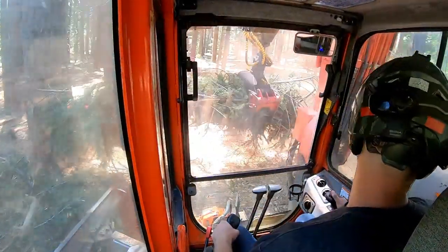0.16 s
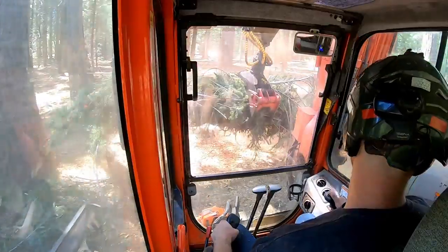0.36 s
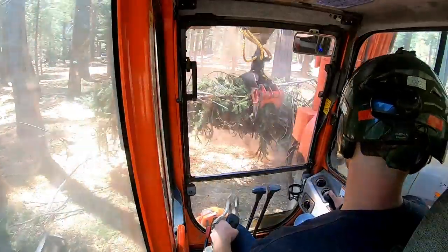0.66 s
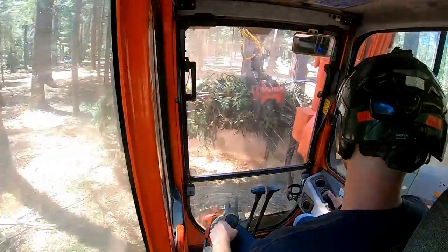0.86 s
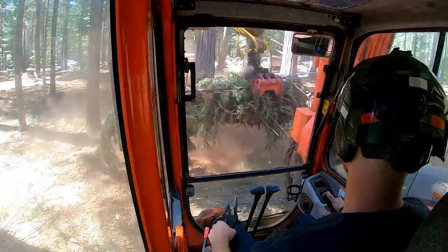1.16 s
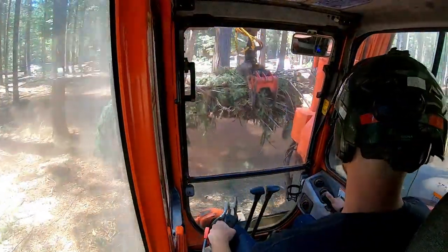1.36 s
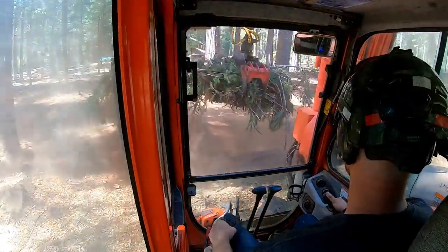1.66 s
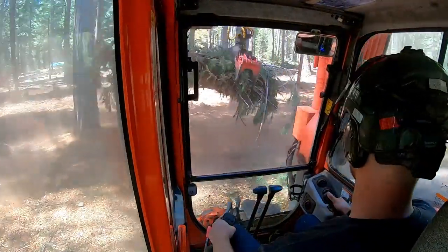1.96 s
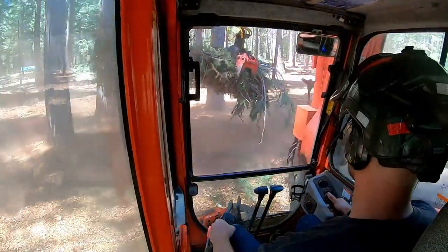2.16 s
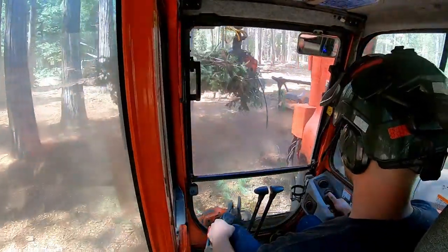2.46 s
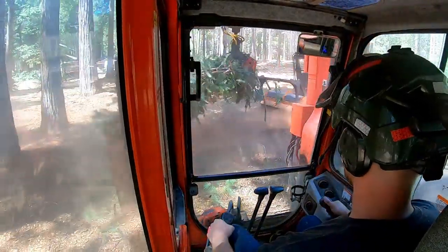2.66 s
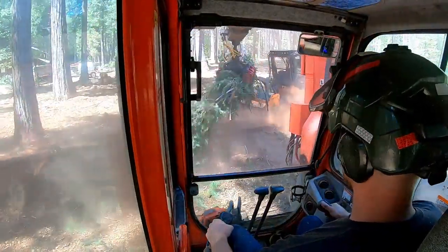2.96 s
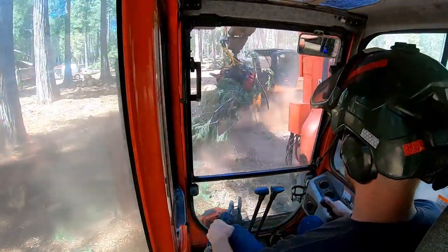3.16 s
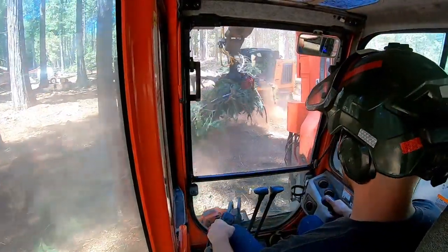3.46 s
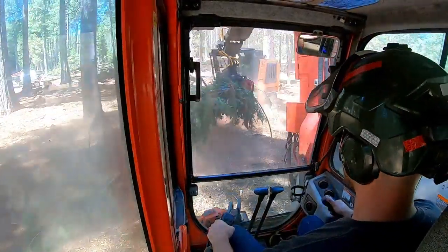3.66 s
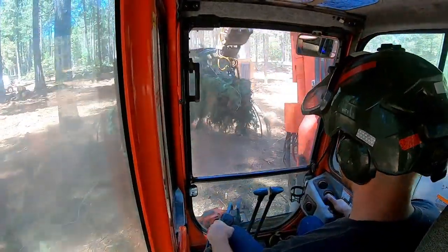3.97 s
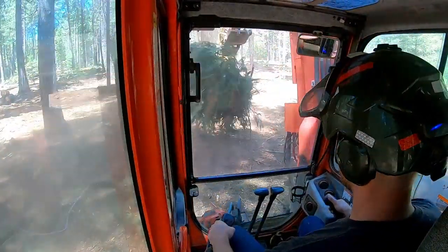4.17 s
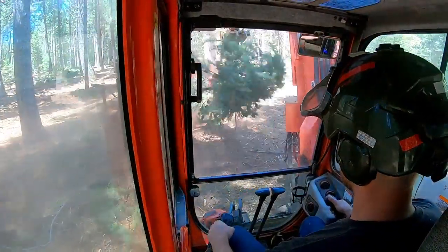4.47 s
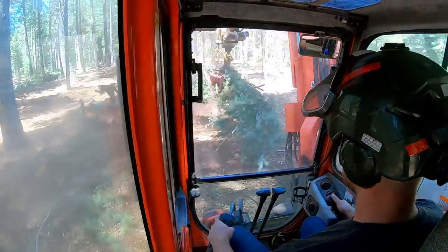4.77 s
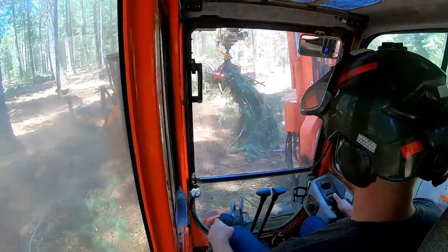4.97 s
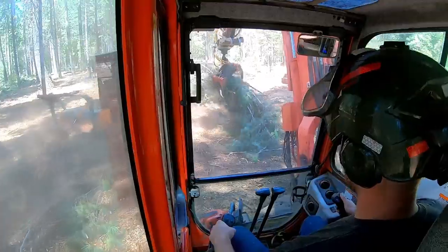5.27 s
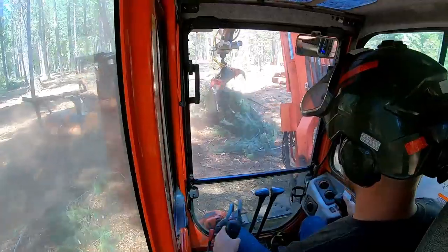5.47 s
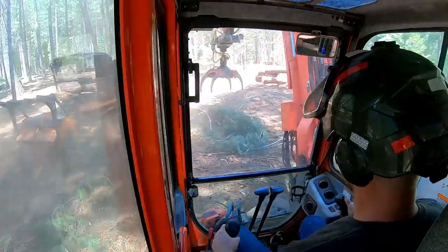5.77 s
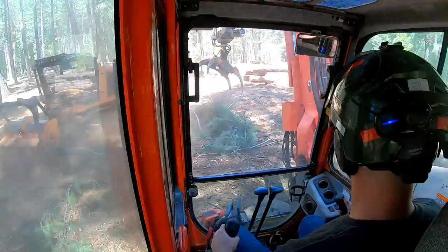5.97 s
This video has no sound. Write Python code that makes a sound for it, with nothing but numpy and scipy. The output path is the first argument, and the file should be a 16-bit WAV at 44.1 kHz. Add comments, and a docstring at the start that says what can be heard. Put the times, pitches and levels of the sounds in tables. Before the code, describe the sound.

A close, bass-heavy cab interior: thick diesel drone and panel roar, low frame shudder, hydraulic whine and hiss that rise with each arm movement. The engine drops in pitch in steps under load. Behind the glass, faint mulcher noise, scraping branches and crackling twigs, denser late on, with a crunch as brush is released. A microphone in the cab catches a sudden loud click and coarse burst at the end.

```python
"""A four-cylinder diesel drones and sags, heard inside the closed cab of a tracked forestry machine.
Its firing boom, pump whines and clatter are locked to the crankshaft; roar, oil hiss and shudder are shaped noise.
A mulcher grinds nearby, and a grapple of brush crackles, scrapes and crunches faintly through the glass.
At the very end comes a sharp click, then two short ringing bursts and a harsh, wide rasp of noise."""
import sys
import numpy as np
from scipy import signal
from scipy.fft import rfft, irfft, next_fast_len
from scipy.io import wavfile
from scipy.ndimage import uniform_filter1d, minimum_filter1d, map_coordinates

SR = 44100
rng = np.random.default_rng(int(sys.argv[2]) if len(sys.argv) > 2 else 0)


def materialize(psi):
    """Save the field psi as 16-bit PCM at rate SR to the path in sys.argv[1].

    A 1-D psi becomes a single channel; in a 2-D psi each row is a channel.
    """
    bounded = np.clip(np.atleast_2d(psi).T, -1, 1)
    quanta = np.round(bounded * 32767).astype(np.int16)
    wavfile.write(sys.argv[1], SR, quanta)


N = 269892
TIME = np.arange(N) / SR  # s

# Faint, steady airy hiss in the treble: f/Hz, relative density/dB per Hz
AIR_SPECTRUM = [(3000, -13.5), (6000, -0.5), (8500, -3), (10500, -10), (14000, -27.5)]
AIR_DB = -78

# Machine noise behind the cab walls: f/Hz, relative density/dB per Hz
CAB_WALLS = [(60.0, -4), (90.0, -1.5), (160.0, -1.5), (300.0, -7), (420.0, -18.5), (650.0, -24.5),
             (850.0, -32.5), (1500.0, -35), (2100.0, -43), (3100.0, -43), (3900.0, -46), (5200.0, -49),
             (6200.0, -59), (11000.0, -78)]
# Narrow rings of window panes and trim: f/Hz, half width/Hz, lift/dB
CAB_RINGS = [(121.6,10.2,5.5), (171.3,15.8,9.5), (201.5,14,7.5), (254.2,2.7,3.5), (293.7,28,5),
             (406.4,28,5), (431.3,17.2,8.5), (489.5,31,5.5), (538,14,6), (687,29,5.5), (980,27,4),
             (1116,45,5.5), (1230,17,3.5), (1305,26,3), (1380,25,4), (1530,31,4), (1750,50,7.5),
             (1995,29,3.5), (2230,35,3), (2420,80,6), (2527,45,5.5), (2660,40,3.5), (2880,44,8),
             (3280,81,2.5), (3520,50,2.5), (4500,83,4), (5070,67,0.5)]
# Where the cab's standing waves mostly cancel: f/Hz, half width/Hz, lift/dB
CAB_NULLS = [(65, 4.1, -5), (231, 8, 0), (350, 7.2, -4), (457.5, 11, -6.5), (553.4, 15, -3.5),
             (850, 18, 0.5)]
# What the panes let through of a scrape: f/Hz, level/dB
GLASS_PASS = [(5000, 1.5), (9000, -0.5), (11500, -7), (14000, -20)]
# How alike the left and right noise is: f/Hz, correlation
STEREO_LIKENESS = [(500, 1), (1000, 1), (2000, 0.98), (4500, 0.96), (7000, 0.58), (10000, 0.33),
                   (13000, 0.18)]

# The mulcher through the glass, on top of the cab's colour: f/Hz, level/dB
MULCHER_TONE = [(550, -51.5), (850, -3.5), (1040, -2.5), (1160, 0.5), (1350, -5), (2000, -7.5), (4000, -26.5)]
MULCHER_DB, MULCHER_DB_PER_S = -52.5, 0.8  # it grows louder as the cab turns towards it

# Level of the many tiny twig snaps: t/s, level/dB
TWIG_LEVEL = [(0, -76.5), (1.5, -77.5), (1.9, -73.5), (2.8, -71), (3.3, -75.5), (4.2, -69.5), (4.7, -64.5),
              (5.5, -65), (6.12, -63.5)]
# Colour of the tiny snaps: f/Hz, relative density/dB per Hz
TWIG_SPECTRUM = [(900, -18.5), (2600, 4), (3800, -5), (5200, -6), (6400, -12), (8200, -13), (11000, -31),
                 (14000, -45)]
TWIGS_PER_S, TWIG_DECAY_S = 60, 0.003
BREAK_SPREAD_DB = 2  # how much single breaks differ, in twigs and crunches
# Single sticks that snap: t/s, level/dB
STICK_SNAPS = [(4.6527, -56.5), (4.844, -57), (4.9169, -56), (5.0348, -55), (5.1408, -59), (5.281, -59.5),
               (5.4472, -58), (5.5, -59.5), (5.6431, -54), (5.8538, -63), (5.9785, -57), (6.0304, -57)]
# Colour of a stick's snap: f/Hz, relative density/dB per Hz
SNAP_SPECTRUM = [(1200, -19), (2700, 0.5), (5000, 1), (6800, -4.5), (9000, -10), (14000, -32.5)]
SNAP_DECAY_S = 0.006

# Short scrapes, ticks and rasps: t at the peak/s, length/s, level/dB, centre f/Hz, width/octaves
SCRAPE_EVENTS = [(1.001, 0.022, -57.5, 3590, 0.63), (1.107, 0.0058, -51.5, 2420, 0.64),
                 (1.592, 0.014, -48.5, 1720, 0.94), (1.901, 0.16, -54.5, 2880, 0.6),
                 (2.299, 0.11, -56.5, 2850, 0.4), (2.469, 0.16, -54, 2750, 0.5),
                 (2.865, 0.085, -71, 6970, .3), (3.401, .015, -49.5, 1130, 0.28),
                 (3.674, 0.021, -52.5, 2500, 0.44), (3.845, 0.025, -56.5, 4600, 0.7),
                 (3.886, 0.034, -44.5, 1190, 0.45), (4.32, 0.018, -51, 2580, 0.36),
                 (4.514, 0.024, -49, 2650, 0.25), (4.546, 0.02, -51.5, 2700, 0.25),
                 (4.66, 0.021, -51.5, 2800, 0.61), (4.859, 0.024, -46.5, 2450, 0.33),
                 (4.854, 0.017, -60.5, 7700, .2), (4.852, 0.019, -65.5, 9620, 0.6),
                 (4.923, .009, -55, 5200, 0.66), (5.141, .014, -64, 6500, 0.59),
                 (5.34, 0.029, -52, 2800, 0.7), (6.012, 0.035, -60, 4700, 0.53)]
SCRAPE_GRAIN_DB = 2.5  # how unevenly a scrape catches and slips
# A dry pivot squeaks: t at the peak/s, length/s, level/dB
PIVOT_SQUEAKS = [(4.368, .011, -73), (4.402, .013, -71), (4.442, 0.012, -66)]

# The brush shifts, slips and lands: t at the peak/s, length/s, level/dB, brightness/dB per octave
CRUNCH_EVENTS = [(3.76, .05, -53.5, 2), (3.844, .025, -48.5, 5.5), (5.413, .015, -41, 1),
                 (5.453, .015, -41.5, 2.5), (5.666, 0.011, -38.5, -1.5), (5.706, .028, -34.5, -0.7),
                 (5.748, .017, -37.5, 2)]
# Colour of the crunches: f/Hz, relative density/dB per Hz
CRUNCH_SPECTRUM = [(400, -8), (800, 2.5), (1300, -1), (1800, -6.5), (2800, -12.5), (4000, -24),
                   (5200, -26.5), (7000, -38), (9000, -44.5), (14000, -64.5)]
CRACKS_PER_S, CRACK_DECAY_S = 2200, 0.001  # the tiny breaks within a crunch
CRUNCH_GRAIN = 0.55  # share that comes as separate cracks; the rest is the rush of needles

# Short ringing bursts just after the click: t/s, level/dB
RING_BURSTS = [(6.083, -23), (6.0945, -29.5)]
# Ringing modes of a burst: f/Hz, level/dB, t60/s
BURST_RINGS = [(660, -6, .06), (783, -5, .045), (1130, -2, .035), (1293, -1, 0.032), (2500, -8, 0.022)]
CLICK_S, CLICK_DB, CLICK_DECAY_S = 6.078, -7, 0.0009  # start, peak, decay
# Colour of the harsh rasp: f/Hz, relative density/dB per Hz
RASP_SPECTRUM = [(300, -3.5), (500, -12.5), (680, 5), (900, -6), (1280, 3.5), (1800, -30.5), (2600, -11.5),
                 (4000, -35), (6000, -28), (9000, -43), (14000, -57)]
RASP_DB, RASP_ATTACK_S = -29, 0.0013
LEFT_LEAN_DB = 2  # rasp and ringing bursts: left up, right down

# Shudder of the frame: f/Hz, relative density/dB per Hz
FRAME_SPECTRUM = [(3, -32.5), (13, -13), (18, 0.5), (29, -2.5), (35, 4.5), (44, -1), (52, 0), (75, -51),
                  (200, -120)]
# Level of the shudder: t/s, level/dB
SHUDDER_LEVEL = [(0, -25), (1.2, -22.5), (1.8, -21.5), (2.6, -34), (4.3, -34.5), (4.8, -28), (6.12, -24.5)]
# The arm jolts the frame: t at the peak/s, rise/dB
FRAME_JOLTS = [(3.13, 16.5), (3.5, 0), (5.45, 9), (5.77, 9.5)]
JOLT_S = 0.084  # length of a jolt

# The arm lifts, swings out, lowers and lets go: start t/s, end t/s,
# rises of oil hiss/dB, engine clatter/dB, exhaust boom/dB, oil pressure/dB
ARM_STROKES = [(1.63, 2.918, 8, 1.5, 4, 2.5), (3.777, 4.603, 5.5, 0.5, 3.5, -1),
               (4.591, 5.39, 7, 1.1, 1, 1.5), (5.372, 6.3, 6, -1, -1, 1.5)]
VALVE_S = 0.14  # time scale of a valve opening or closing
# Oil hiss in the valves: f/Hz, relative density/dB per Hz
VALVE_SPECTRUM = [(1000, -41), (2200, 1.5), (3100, 12), (3900, -5.5), (5100, 1.5), (6200, -8.5),
                  (7100, -5.5), (9000, -19), (12000, -33), (14000, -43.5)]
# Growl of the oil lines: f/Hz, relative density/dB per Hz
HOSE_SPECTRUM = [(230, -29.5), (285, 5), (335, -10), (385, -1), (440, -3.5), (475, -23), (900, -59.5)]
HOSE_DB = -40.5  # at a pressure rise of 1 dB
HISS_DB, CLATTER_DB, EXHAUST_DB = -68, -52.5, -21  # with the arm at rest

# Pump whines: multiple of the crank speed, level/dB, share of the oil pressure rise (0-1)
PUMP_LINES = [(10, -35, .8), (12, -32, 0), (15, -40, .8), (20, -49, 0), (24, -49.7, 0)]
# A whine swells or dips: multiple of the crank speed, t at the peak/s, length/s, rise/dB
PUMP_SWELLS = [(12, 1.17, 0.13, 6), (12, 1.48, 0.041, 3.5), (12, 1.95, 0.092, 8.5), (12, 1.98, 0.12, 7),
               (12, 3.044, 0.095, 3.5), (12, 3.27, .06, -7.5), (12, 3.62, 0.052, 5), (24, 2.05, .3, -7),
               (24, 3.9, 0.13, 1.5), (24, 4.72, .1, 2)]
# Standing waves that lift a whine gliding through them: f/Hz, half width/Hz, lift/dB
STANDING_WAVES = [(247, 10, 11.3), (313.5, 8, 8), (376, 18, 5.5), (486, 12, 13), (533, 6, 12.5),
                  (594, 14, 11), (638, 6, 10.5)]

# Panel roar and engine clatter, on top of the cab's colour: f/Hz, level/dB
ROAR_TONE = [(30, -41.0), (55, -0.5), (220, -0.5), (320, 0.0), (750, -1), (1100, -18.5), (4000, -50.0)]
CLATTER_TONE = [(700, -30.0), (1500, 0.5), (2200, 4.5), (5000, -0.5), (8000, -2.0), (14000, -26.5)]
ROAR_DB = -16.5  # before its deep part rises or falls
# Change of the roar's deep part: t/s, level/dB
DEEP_ROAR_LEVEL = [(0, -0.5), (1.6, -1), (2.3, -7.5), (2.9, -1), (3.6, 2.5), (4.4, -2), (5.2, 2),
                   (6.12, -2)]
DEEP_HZ = 135  # where the deep part ends

# Engine speed, sagging under load: t/s, rate/firings per s
FIRING_RATE = [(0,53.5),(1.4,52.85),(1.55,51.9),(1.78,52),(1.9,50),(2.03,49.1),(2.2,50.3),(2.8,50.4),(2.95,52.3),(3.15,51.8),(3.6,52.0),(3.75,50.4),(4.15,48.05),(4.55,48.2),(4.73,48.9),(4.95,48.5),(5.1,50.1),(5.27,50.1),(5.42,47.7),(6.12,47.9)]
# Weaker engine lines: multiple of the crank speed, level/dB
ENGINE_LINES = [(4, -29.5), (5, -30), (6, -36.5), (7, -34), (8, -45), (18, -51), (36, -59.5)]
WANDER_TURNS = 0.002  # scale of the crankshaft's random lead or lag on an even pace

PORT_LAG_S, TOP_HZ = 19e-6, 14200  # microphone: lag of the left port, upper band limit


def amp(db):
    """Decibels to gain."""
    return 10 ** (np.asarray(db) / 20)


def unit(x):
    """Scale to rms 1."""
    return x / np.sqrt(np.mean(x ** 2) + 1e-20)


def along(points, hz):
    """Read (frequency, value) points on a log frequency axis."""
    f, v = np.transpose(points)
    return np.interp(np.log(hz + 1), np.log(f + 1), v)


def curves(rows):
    """One value per sample for each column after the time."""
    s, *cols = np.transpose(rows)
    return [np.interp(TIME, s, c) for c in cols]


def wobble(rate):
    """A smooth random curve with rate knots a second."""
    knots = rng.standard_normal(int(N * rate / SR) + 4)
    return map_coordinates(knots, [TIME * rate])


def swell(s, length):
    """A bell-shaped envelope around time s."""
    return np.exp(-((TIME - s) / length) ** 2)


def lift_db(resonances, hz):
    """The lift that a set of resonances gives each frequency."""
    return sum(db * np.exp(-((hz - centre) / width) ** 2) for centre, width, db in resonances)


def filtered(x, response):
    """Apply a response of frequency, with padding against wrap-around."""
    m = next_fast_len(x.shape[-1] + 8192)
    spectrum = rfft(x, m) * response(np.fft.rfftfreq(m, 1 / SR))
    return irfft(spectrum, m)[..., :x.shape[-1]]


def rush(colour_db, size=N, drive=1):
    """Stereo noise of rms 1, pulsed by its drive and then coloured: mono in the bass, diffuse in the treble."""
    def mid_side_response(hz):
        turn = np.arccos(np.clip(along(STEREO_LIKENESS, hz), -1, 1)) / 2
        return amp(colour_db(hz)) * np.array([np.cos(turn), np.sin(turn)])

    mid, side = filtered(drive * rng.standard_normal((2, size)), mid_side_response)
    return unit(np.array([mid + side, mid - side]))


def steadied(x, seconds, share):
    """Take a share of the slow surges out of a noise."""
    power = np.abs(uniform_filter1d(x ** 2, size=int(seconds * SR))) + 1e-9
    return unit(x / power ** (np.clip(share, 0, 1) / 2))


def crackle(per_s, decay_s):
    """An envelope of sudden, decaying breaks at random times and of random size."""
    sizes = amp(BREAK_SPREAD_DB * np.clip(rng.standard_normal(N), -2, 2))
    breaks = (rng.random(N) < per_s / SR) * sizes
    return signal.lfilter([1], [1, -np.exp(-1 / (decay_s * SR))], breaks)


def cab_db(hz):
    """Colour of the closed cab: muffling walls, ringing panes and trim, and standing-wave nulls."""
    return along(CAB_WALLS, hz) + lift_db(CAB_RINGS, hz) + lift_db(CAB_NULLS, hz)


def airy_hiss():
    """A faint, steady airy hiss of treble noise."""
    return amp(AIR_DB) * rush(lambda hz: along(AIR_SPECTRUM, hz))


def mulcher():
    """The nearby mulcher rasps through the glass: noise with a random, chewing flutter."""
    rasp = rush(lambda hz: cab_db(hz) + along(MULCHER_TONE, hz))
    chewing = amp(0.77 * wobble(30) + 1.1 * wobble(180))
    return amp(MULCHER_DB + MULCHER_DB_PER_S * TIME) * unit(rasp * chewing)


def twigs():
    """Twigs in the grapple break in many tiny decaying noise bursts; single sticks snap more clearly later on."""
    colour = lambda hz: along(TWIG_SPECTRUM, hz) + lift_db(CAB_RINGS, hz)
    tiny = rush(colour, drive=crackle(TWIGS_PER_S, TWIG_DECAY_S))
    snap_envelope = sum(amp(db) * (TIME > s) * np.exp(-np.abs(TIME - s) / SNAP_DECAY_S)
                        for s, db in STICK_SNAPS)
    sticks = snap_envelope * rush(lambda hz: along(SNAP_SPECTRUM, hz))
    return amp(curves(TWIG_LEVEL)[0]) * tiny + sticks


def scrapes():
    """Branches and fittings catch and slip: short, grainy bands of noise coloured by glass and cab."""
    out = np.zeros((2, N))
    grain = unit(amp(SCRAPE_GRAIN_DB * wobble(300)))
    for s, length, db, centre_hz, octaves in SCRAPE_EVENTS:
        near = np.abs(TIME - s) < 0.25

        def colour(hz):
            distance = np.log2((hz + 1) / centre_hz) / octaves
            return along(GLASS_PASS, hz) + lift_db(CAB_RINGS, hz) - 24 * np.log(1 + distance ** 2 / 2)

        envelope = amp(db) * (swell(s, length) * grain)[near]
        out[:, near] += envelope * rush(colour, size=near.sum())
    return out


def squeaks(pitch_hz=7420):
    """A dry pivot slips three times: a thin sine squeal with a wavering phase."""
    tone = np.sqrt(2) * np.sin(2 * np.pi * pitch_hz * TIME + 0.83 * wobble(250))
    return tone * sum(amp(db) * swell(s, length) for s, length, db in PIVOT_SQUEAKS)


def crunches():
    """Shifting and falling brush: bursts of dense little breaks in a rush of needles, some brighter than others."""
    out = np.zeros((2, N))
    share = np.clip(CRUNCH_GRAIN, 0, 1)
    cracks = 1 - share + share * unit(crackle(CRACKS_PER_S, CRACK_DECAY_S))
    for s, length, db, tilt_db in CRUNCH_EVENTS:
        near = np.abs(TIME - s) < 0.1
        colour = lambda hz: along(CRUNCH_SPECTRUM, hz) + tilt_db * np.log2(hz + 1)
        burst = rush(colour, size=near.sum(), drive=cracks[near])
        out[:, near] += amp(db) * swell(s, length)[near] * burst
    return out


def left_lean():
    """Left and right gains of the sounds that lean left."""
    return amp(LEFT_LEAN_DB * np.array([[1], [-1]]))


def ring_bursts():
    """Each burst rings the same few short, hollow modes as decaying sines, leaning left."""
    out = np.zeros(N)
    for s, db in RING_BURSTS:
        age = np.maximum(TIME - s, 0)
        out += sum(amp(db + level - 60 * age / t60) * np.sin(2 * np.pi * hz * age)
                   for hz, level, t60 in BURST_RINGS)
    return out * left_lean()


def click_and_rasp():
    """A one-sided, decaying click, and with it a harsh, wide noise that rasps on to the end."""
    age = np.maximum(TIME - CLICK_S, 0)
    click = amp(CLICK_DB) * (age > 0) * np.exp(-age / CLICK_DECAY_S)
    rasp = unit(filtered(rng.standard_normal((2, N)), lambda hz: amp(along(RASP_SPECTRUM, hz))))
    rasp = unit(rasp + 0.23 * rasp[::-1])  # some of each side leaks into the other
    attack = 1 - np.exp(-age / RASP_ATTACK_S)
    return click + amp(RASP_DB) * left_lean() * attack * rasp


def shudder():
    """The frame shakes on its mounts with an even, low throb that swells at the jolts."""
    shake = rush(lambda hz: along(FRAME_SPECTRUM, hz))[0]
    level_db = curves(SHUDDER_LEVEL)[0] + sum(db * swell(s, JOLT_S) for s, db in FRAME_JOLTS)
    even = steadied(shake, seconds=0.31, share=0.99)
    return amp(level_db) * filtered(even, lambda hz: 1 / (1 + (hz / 90) ** 8))


def strokes():
    """Rises in dB of hiss, clatter, boom and pressure: each stroke opens a valve, holds it and closes it."""
    opened = lambda s: (1 + np.tanh((TIME - s) / VALVE_S)) / 2
    return sum(np.outer(rises, opened(start) - opened(end)) for start, end, *rises in ARM_STROKES)


def valves(flow_db):
    """Oil hisses through the spools: unsteady noise that rises while the arm moves."""
    level_db = HISS_DB + flow_db + 0.7 * wobble(3.6) + 0.55 * wobble(25)
    return amp(level_db) * rush(lambda hz: along(VALVE_SPECTRUM, hz))


def hoses(pressure_db):
    """The oil lines growl in proportion to the pressure change and are silent at rest."""
    return amp(HOSE_DB) * pressure_db * rush(lambda hz: along(HOSE_SPECTRUM, hz))


def line(crank, multiple, flutter_db, drift):
    """A sine at one multiple of the crank speed, slightly unsteady in size (dB) and phase (radians)."""
    phase = 2 * np.pi * (multiple * crank + rng.random()) + drift * wobble(12)
    return np.sqrt(2) * np.sin(phase) * amp(flutter_db * wobble(14))


def pumps(crank, crank_hz, pressure_db):
    """Pumps on the crankshaft whine in slow swells; each line grows as it glides through a standing wave."""
    out = np.zeros(N)
    for multiple, db, share in PUMP_LINES:
        swell_db = sum(rise * swell(s, length) for k, s, length, rise in PUMP_SWELLS
                       if round(k) == multiple)
        level_db = db + share * pressure_db + swell_db + lift_db(STANDING_WAVES, multiple * crank_hz)
        out += amp(level_db) * line(crank, multiple, flutter_db=0.5, drift=0.094)
    return out


def clatter(crank, load_db):
    """Engine clatter in the cab: noise that pulses with each firing and flutters at random."""
    firing = 2 * np.pi * 2 * crank
    noise = rush(lambda hz: cab_db(hz) + along(CLATTER_TONE, hz))
    beat = amp(0.64 * np.cos(firing) + 1.0 * np.cos(2 * firing) + 0.87 * wobble(60))
    return amp(CLATTER_DB + load_db) * unit(noise * beat)


def panel_roar(crank):
    """The cab panels boom: dense noise that throbs with each firing, its deep part rising and falling."""
    throb = amp(2.4 * np.cos(2 * np.pi * 2 * crank))
    noise = rush(lambda hz: cab_db(hz) + along(ROAR_TONE, hz), drive=throb)
    roar = steadied(noise, seconds=0.13, share=0.31)
    deep = filtered(roar, lambda hz: 1 / (1 + (hz / DEEP_HZ) ** 12))
    return amp(ROAR_DB) * (roar + (amp(curves(DEEP_ROAR_LEVEL)[0]) - 1) * deep)


def engine(crank, load_db):
    """Two firings a turn make the boom, which varies with load; unequal cylinders add weaker lines."""
    boom = amp(EXHAUST_DB + load_db) * line(crank, 2, flutter_db=0.5, drift=0.04)
    weaker = sum(amp(db) * line(crank, round(k), flutter_db=3.0, drift=0.71) for k, db in ENGINE_LINES)
    return boom + weaker


def scene():
    """Engine, pumps, roar and clatter follow the crankshaft, counted in turns; arm strokes set the load rises."""
    crank_hz = curves(FIRING_RATE)[0] / 2  # two firings a turn
    crank = np.cumsum(crank_hz) / SR + WANDER_TURNS * wobble(7)
    flow_db, clatter_db, boom_db, pressure_db = strokes()
    background = airy_hiss() + mulcher() + twigs() + scrapes() + squeaks() + crunches()
    ending = ring_bursts() + click_and_rasp()
    hydraulics = valves(flow_db) + hoses(pressure_db) + pumps(crank, crank_hz, pressure_db)
    diesel = clatter(crank, clatter_db) + panel_roar(crank) + engine(crank, boom_db)
    return background + ending + shudder() + hydraulics + diesel


def record(dry):
    """A limiter holds the peaks; the microphone's left port hears late, and nothing passes above the band limit."""
    needed = np.minimum(1, amp(-4.1) / (np.abs(dry).max(axis=0) + 1e-9))
    gain = uniform_filter1d(minimum_filter1d(needed, size=900), size=900)  # windows in samples
    fade = np.clip(np.minimum(TIME, TIME[-1] - TIME) / 0.003, 0, 1)  # 3 ms at each end
    ports = lambda hz: np.exp(-2j * np.pi * hz * np.array([[PORT_LAG_S], [0]]))
    return filtered(dry * gain * fade, lambda hz: ports(hz) * (hz < TOP_HZ))


dry = scene()
out = record(dry)
materialize(out)
```